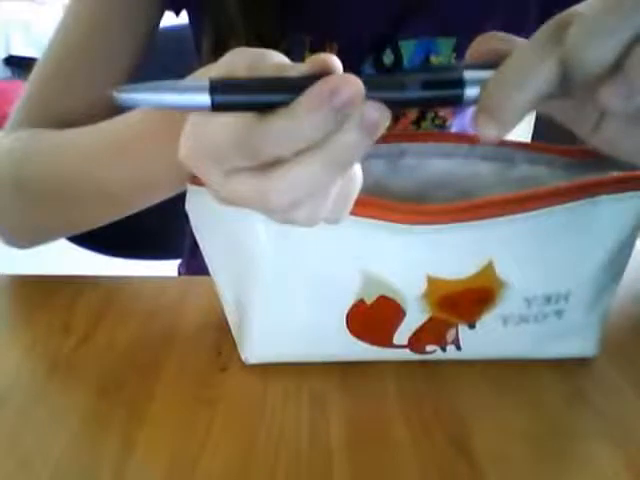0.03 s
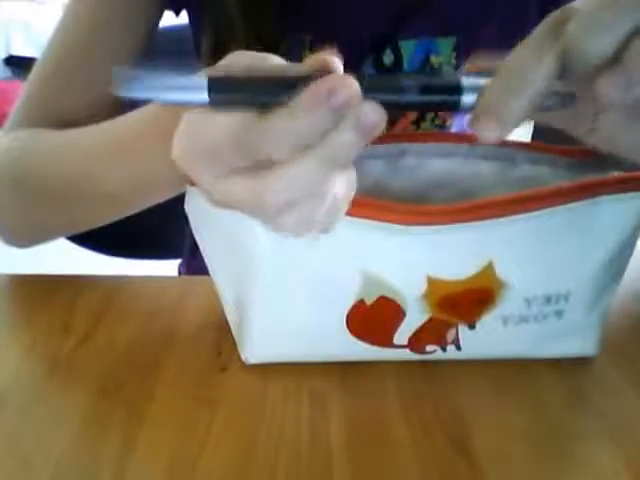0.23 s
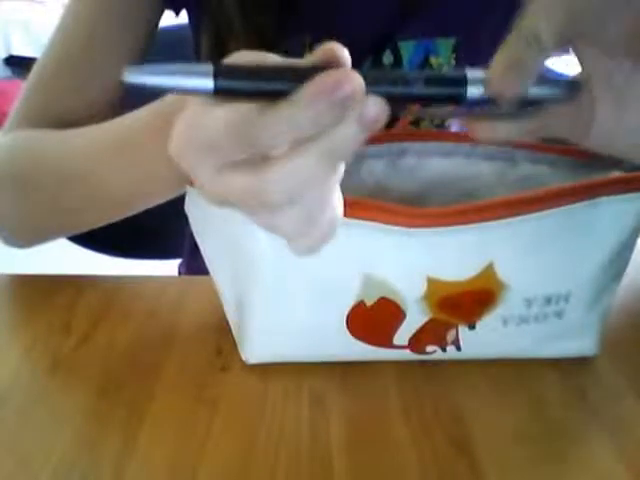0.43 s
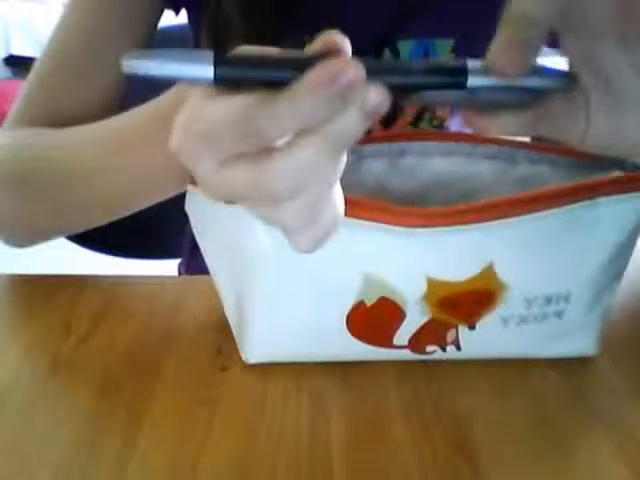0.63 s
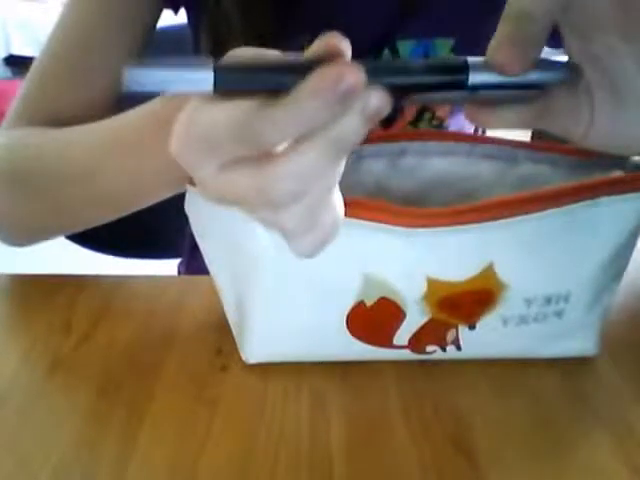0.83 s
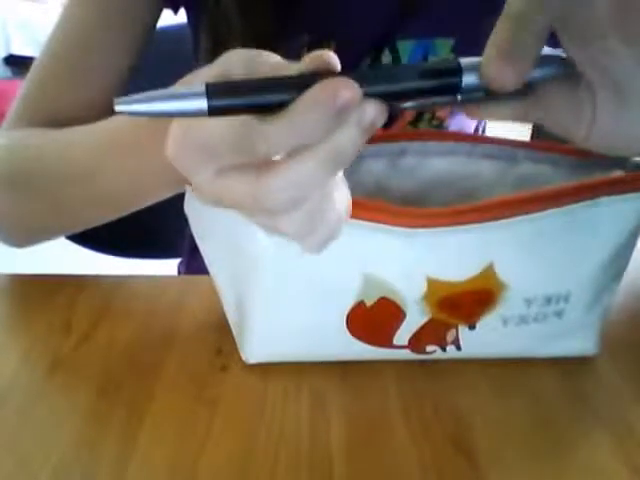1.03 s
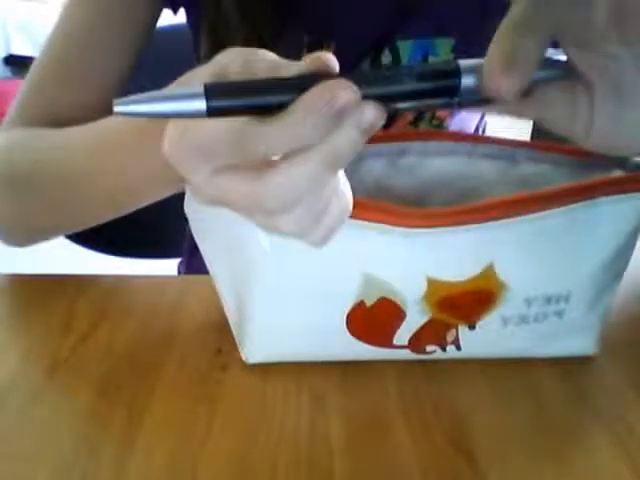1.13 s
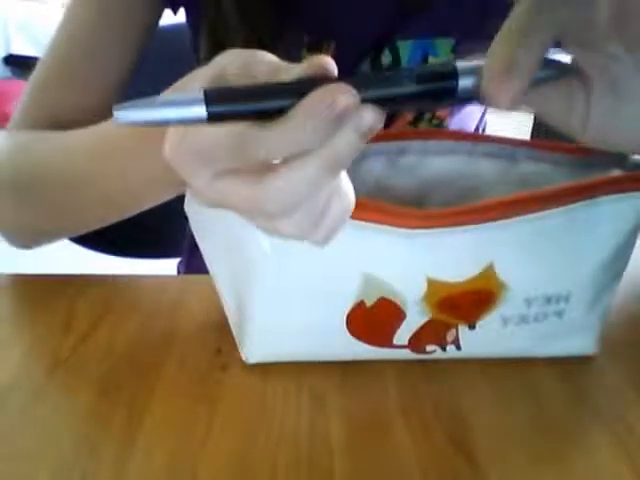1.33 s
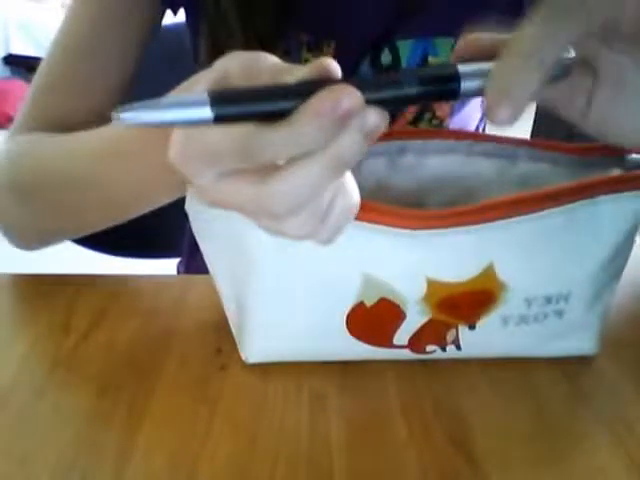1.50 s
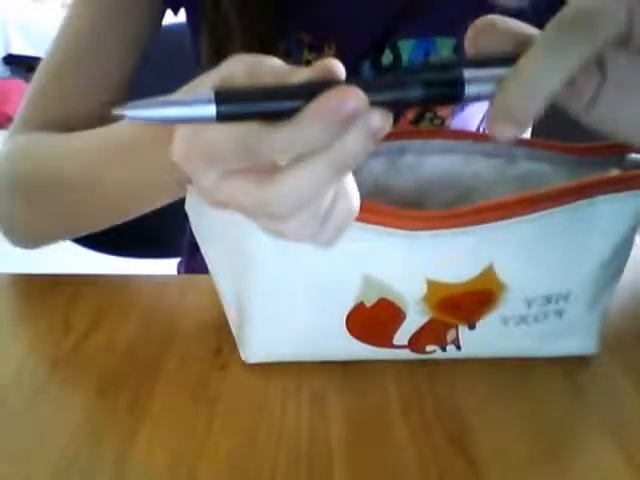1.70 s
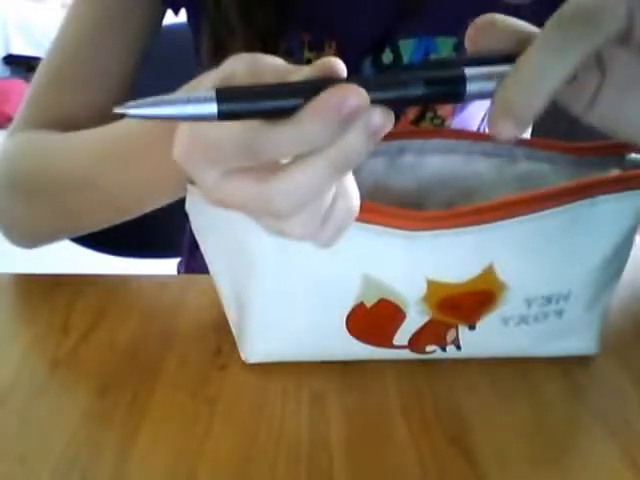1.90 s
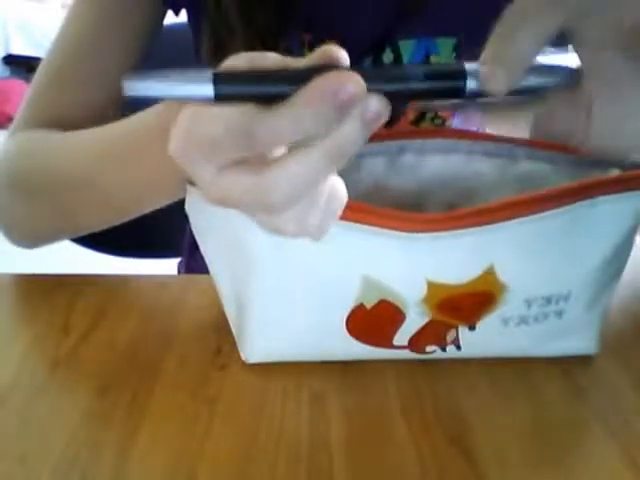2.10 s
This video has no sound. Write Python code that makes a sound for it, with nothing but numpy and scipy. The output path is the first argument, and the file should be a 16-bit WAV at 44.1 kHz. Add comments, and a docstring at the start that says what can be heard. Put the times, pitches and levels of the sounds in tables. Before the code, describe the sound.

A twist-action pen clicks sharply twice, with small ticks and faint scrapes between, in a quiet room.

```python
"""Hiss, hum, a faint intermittent whine and a soft low bump come first, in a quiet room close to a microphone.
Then a hand turns a twist-action pen: its mechanism snaps over its stops, with faint ticks in between.
Each snap is a noise crack plus decaying modes of the barrel; the thread scrapes as grains of small clicks.
Swelling noise bands make the hands' bumps and rubs and the singing spring.
Convolution with echoes and decaying noise makes the desk and room answer."""
import sys
import numpy as np
from scipy import signal
from scipy.fft import rfft, irfft
from scipy.io import wavfile
from scipy.ndimage import uniform_filter1d

SR = 44100
rng = np.random.default_rng(int(sys.argv[2]) if len(sys.argv) > 2 else 0)


def to_wav(sig):
    """Store sig (one row per channel, or 1-D mono) as 16-bit WAV at the path in sys.argv[1].

    Samples outside -1..1 are clipped; the rate is SR.
    """
    pcm = np.clip(np.atleast_2d(sig), -1, 1) * 32767
    pcm = np.round(pcm).astype(np.int16)
    wavfile.write(sys.argv[1], SR, pcm.T)  # frames by channels


N = 94903  # length in samples


def amp(db):
    """Logarithmic level: decibels become a linear amplitude ratio."""
    return 10 ** (np.asarray(db) / 20)


def unit(x):
    """Normalisation: the root-mean-square value becomes 1."""
    return x / np.sqrt(np.mean(x ** 2) + 1e-20)


def read(points, hz):
    """Interpolation on a logarithmic frequency axis, with constant values beyond both ends."""
    f, value = np.transpose(points)
    return np.interp(np.log(hz + 1), np.log(f + 1), value)


def add(mix, s, sound):
    """Superposition: a sound is summed into the mix at a time in seconds."""
    part = mix[max(round(s * SR), 0):][:len(sound)]
    part += sound[:len(part)]


def noise(gain, size):
    """Random-phase synthesis: noise of rms 1 whose amplitude spectrum is gain(Hz)."""
    hz = np.fft.rfftfreq(size, 1 / SR)
    phase = 2 * np.pi * rng.random(len(hz))
    return unit(irfft(gain(hz) * np.exp(1j * phase), size))


def band(hz, width_hz, size):
    """Resonance: noise under a single bell-shaped spectral peak."""
    return noise(lambda f: 1 / (1 + (2 * (f - hz) / width_hz) ** 2), size)


def swell(length, hz, width_hz, db):
    """Amplitude modulation: a band of noise swells and fades under a half sine, at an rms level in dB."""
    n = int(length * SR)
    envelope = np.sin(np.pi * np.arange(n) / n)
    return amp(db) * unit(band(hz, width_hz, size=16384)[:n] * envelope)


def background():
    """Stationary noise: room rumble and microphone hiss, with narrow-band hum and an intermittent whine."""
    # Spectrum of rumble and hiss. Each row: frequency in Hz, relative level in dB per Hz.
    floor_spectrum = [(15, -40.5), (25, -2.5), (48, -3), (76, -15), (114, -6), (256, -19), (354, -17),
                      (840, -19.5), (911, -19.5), (2000, -26), (4610, -31.5), (6210, -23.5), (6740, -36.5),
                      (8140, -36), (16000, -56)]
    # Start times of the whine in seconds.
    whine_starts = [0.10, 0.227, 0.605, 0.73, 0.858, 1.235, 1.36, 1.74, 1.865, 1.992, 2.118]
    floor_db, patch_db = -65.5, 1
    hiss_hz, hiss_width_hz, hiss_db = 6147, 390, -74  # a narrow band in the hiss
    hum_hz, hum_width_hz, hum_db = 118.3, 5, -76
    whine_hz, whine_width_hz, whine_s, whine_db = 7990, 70, 0.042, -79

    z = signal.stft(noise(lambda f: amp(read(floor_spectrum, f)), N), nperseg=1024)[2]
    # The level varies gently in patches of time and frequency
    patches = uniform_filter1d(rng.standard_normal(z.shape), size=12, axis=0)
    patches = unit(uniform_filter1d(patches, size=8, axis=1))
    rumble_and_hiss = signal.istft(z * amp(patch_db * patches), nperseg=1024)[1][:N]
    out = amp(floor_db) * unit(rumble_and_hiss)
    out += amp(hiss_db) * band(hiss_hz, hiss_width_hz, N)
    out += amp(hum_db) * band(hum_hz, hum_width_hz, N)
    for s in whine_starts:
        add(out, s, swell(whine_s, whine_hz, whine_width_hz, whine_db))
    return out


def room(x):
    """Linear convolution: direct sound, a few single echoes, close scatter and a short reverberant tail."""
    # Reflections from the desk and nearby things. Each row: delay in seconds, level in dB.
    reflections = [(.0012, -18.5), (.0023, -14), (.0047, -27), (.0083, -21), (0.0196, -27.5)]
    # Reverberation time. Each row: frequency in Hz, time to fall 60 dB in seconds.
    reverberation = [(300, .25), (2000, 0.24), (4000, 0.2), (6000, 0.22), (9000, 0.21), (15000, 0.11)]
    tail_db, near_db = -11.5, -6.5  # energy relative to the direct sound
    rise_s, near_t60_s = 0.0024, 0.032
    size = 16384
    t = np.arange(size) / SR

    hz, frames, z = signal.stft(noise(np.ones_like, size), SR, nperseg=256)
    decay = amp(-60 * frames / read(reverberation, hz)[:, None])
    tail = signal.istft(z * decay, SR, nperseg=256)[1][:size]
    near = noise(np.ones_like, size) * amp(-60 * t / near_t60_s)
    rise = np.minimum(t / rise_s, 1) ** 2
    response = (amp(tail_db) * unit(tail * rise) + amp(near_db) * unit(near * rise)) / np.sqrt(size)
    response[0] += 1  # direct sound
    for delay, db in reflections:
        add(response, delay, amp([db]))
    return signal.fftconvolve(x, response)[:N]


def hands():
    """Low-frequency noise bursts: the soft handling bumps of the hands."""
    # Soft bumps. Each row: start in seconds, length in seconds, centre frequency in Hz, rms level in dB.
    hand_bumps = [(0.079, 0.066, 105, -69.5), (0.409, 0.034, 50, -69), (0.497, 0.11, 115, -66),
                  (0.821, 0.04, 68.9, -64.5), (0.83, 0.034, 178, -67.5), (0.98, 0.058, 67, -62),
                  (0.995, 0.032, 140, -65), (1.27, 0.12, 121.4, -62.5), (1.348, 0.067, 60, -62.5),
                  (1.551, 0.036, 90, -57), (1.607, 0.038, 75.14, -53.5), (1.608, .06, 38, -53),
                  (1.843, 0.092, 115, -64), (1.991, .04, 60, -62.5), (2.031, 0.082, 154.2, -54.5),
                  (2.059, 0.15, 63.7, -65)]
    out = np.zeros(N)
    for s, length, hz, db in hand_bumps:
        add(out, s, swell(length, hz, width_hz=34, db=db))
    return out


def scrape(count=8):
    """Granular friction: turning the thread gives tiny slips at random moments."""
    # Scraping spells. Each row: start in seconds, length in seconds, central grain level in dB.
    scraping_spells = [(1.12, .13, -56), (1.279, 0.19, -55.5)]
    spread_db, grain_clack_db = 5, 9  # half-range of grain levels; emphasis of the clack range
    out = np.zeros(N)
    for s, length, db in scraping_spells:
        for when, size in rng.random((count, 2)):
            grain_db = db + spread_db * (2 * size - 1)
            add(out, s + length * when, click(grain_db, 0, 0, 0, grain_clack_db, 0, 0))
    return out


def click(db, thud_db, knock_db, hollow_db, clack_db, treble_db, air_db, size=1600):
    """Modal synthesis: contact noise and decaying modes, neighbours in opposite polarity, form one snap."""
    # Modes of the barrel and mechanism before detuning and colouring.
    # Each row: frequency in Hz, level in dB, time to fall 60 dB in seconds.
    pen_modes = [ (1127, -34, 0.018), (1973, -24.5, 0.018), (2693, -29.5, 0.0086), (3659, -19, .009),
                 (4370, -15.5, .010), (4880, -15.5, 0.0073), (5420, -8.5, .013), (5760, -10, .015),
                 (6302, -10, 0.016), (7100, -14.5, 0.014), (7320, -16.5, .010), (7640, -21.5, 0.017),
                 (8720, -28.5, .008), (9800, -29.5, .008), (11100, -34, 0.014), (12400, -39, .007),
                 (14000, -41, .006), ]
    # Crack of the contact before colouring. Each row: frequency in Hz, relative level in dB per Hz.
    crack_spectrum = [(100, -35.5), (320, -28.5), (600, -29.5), (1300, -17.5), (2500, -20), (3600, -7),
                      (4500, -8), (6000, 4.5), (8000, -7.5), (9500, -11), (12000, -22.5), (15500, -30)]
    crack_db, crack_t60_s = -11, 0.017
    detune = 0.011  # the grip shifts each mode by up to this fraction from click to click
    contact_s = 0.0005  # linear rise of a click
    # Centres of the ranges in Hz, with their gains in dB
    colour = [(575, 0), (1150, thud_db), (2160, knock_db), (2800, hollow_db),
              (4580, clack_db), (5830, 0), (9474, treble_db), (11600, air_db)]
    t = np.arange(size) / SR

    hz, level, t60 = np.transpose(pen_modes)[:, :, None]
    shift = 1 + detune * rng.uniform(-1, 1, hz.shape)
    envelopes = amp(level + read(colour, hz) - 60 * t / t60)
    modes = envelopes * np.sin(2 * np.pi * hz * shift * t)
    ring = modes[::2].sum(0) - modes[1::2].sum(0)

    crack = noise(lambda f: amp(read(crack_spectrum, f)), size)
    crack = irfft(rfft(crack) * amp(read(colour, np.fft.rfftfreq(size, 1 / SR))))
    crack = crack * amp(crack_db - 60 * t / crack_t60_s)
    return amp(db) * np.minimum(t / contact_s, 1) * (ring + crack)


def pen():
    """Impulsive excitation and narrow-band noise: all clicks, the singing spring and the rubbing fingers."""
    # Snaps and ticks of the mechanism. Each row: start in seconds, level in dB,
    # then gains of the thud, knock, hollow, clack, treble and air ranges in dB.
    mechanism_clicks = [ (0.2900, -38.5, 6, 15, 11.5, 3, -11, -16),
                        (0.335, -39.5, 5, -12.5, -2, -13, -16.5, -14),
                        (0.3482, -31.5, 15, -4.5, -4, 2.5, -9.5, -11),
                        (0.3507, -8, 4, 6.5, -8, 16, 0.5, -1), (0.3685, -28.5, -0.5, 2, 0, 2, 0, -7),
                        (0.4125, -16, 1, -18, 13, 3, -10, 4), (0.4140, -14.5, -6, -4, 4, 1, 11, -4),
                        (0.4168, -11, -16, -2, 0, -5, 0.5, -7), (0.5245, -45, -5, -4, -2, -2, -22, -4),
                        (0.9750, -45.5, 1.5, 1, 7, -11, -17, -7),
                        (0.9993, -37.5, 1, 0.5, 12.5, -8, -16, -16),
                        (1.0650, -52.5, -0.5, 3, 17, -1, -7.5, -5.5),
                        (1.1005, -40.5, 8.5, 8, 12, 3, 0.5, 2), (1.1035, -20.5, -9, 2, 8.5, -4, -0.5, -4.5),
                        (1.1066, -34, -2, -14, 9.5, 2, 5, 1), (1.1190, -36.5, 10, 2, -3, 3, -8, -4),
                        (1.2608, -46, 9.5, 3.5, 22.5, -1, -7, -10.5),
                        (1.3270, -47.5, 5.5, 8.5, 9, 6.5, -11.5, -8),
                        (1.3622, -33.5, -0.5, -2.5, -7.5, -2.5, -6.5, -11),
                        (1.4558, -32, -4.5, 6.5, 5.5, -5.5, -3, -4),
                        (1.4568, -20.5, -25, 1, 1.5, -5.5, -2.5, 2), (1.4912, -41, 8, 11, 7.5, 5.5, 0, -5),
                        (1.5570, -38, -7, 6.5, -2.5, 7, 0, 1.5), (1.5907, -38.5, -1, -1, -2.5, -3, -1.5, 4),
                        (1.5945, -34.5, -3, -7.5, -3.5, -0.5, -7, 2),
                        (1.5975, -28, -6, -1.5, -4.5, -4.5, -7, -3.5), (1.5996, -18, 2.5, 5, 0.5, 1, -2, 0),
                        (1.6006, 0, -1.5, -6.5, 2.5, -3.5, 2.5, 4), (1.6052, -14.5, 3, -2, 0, -5.5, 10, 3),
                        (1.6095, -23.5, 1, 4.5, -1, 0, 0.5, 2.5), (1.651, -35.5, 4.5, 16, 0, 0, 0, 2), ]
    # The spring sings on after the hard snaps.
    # Each row: start in seconds, length in seconds, frequency in Hz, rms level in dB before the room.
    spring_tones = [(0.363, 0.0095, 6220, -37), (0.385, 0.03, 4880, -52.5), (1.606, 0.033, 5983, -35.5),
                    (1.641, 0.0089, 5880, -33.5)]
    # Fingers rub and push on the barrel. Each row: start in seconds, length in seconds,
    # frequency in Hz, bandwidth in Hz, rms level in dB before the room.
    finger_rubs = [(0.412, 0.024, 500, 306, -66.5), (0.77, 0.1, 2050, 398, -75),
                   (1.14, 0.039, 1970, 296, -69.5), (1.318, .05, 1080, 800, -65.5),
                   (1.599, 0.013, 326.4, 160, -50.5)]
    out = np.zeros(N)
    for s, *row in mechanism_clicks:
        add(out, s, click(*row))
    for s, length, hz, db in spring_tones:
        add(out, s, swell(length, hz, width_hz=290, db=db))
    for s, *row in finger_rubs:
        add(out, s, swell(*row))
    return out


def scene():
    """Superposition: the pen in its room is summed with the dry hands and background."""
    pen_in_room = room(pen() + scrape())
    return (pen_in_room + hands() + background())[None]


def record(dry):
    """Saturation and low-pass filtering: the recorder rounds off the highest peaks, then limits the band."""
    ceiling, edge_hz = 0.85, 15700
    held = dry / (1 + (dry / ceiling) ** 6) ** (1 / 6)
    lowpass = signal.firwin(255, edge_hz, window=("kaiser", 8), fs=SR)
    return signal.oaconvolve(held, lowpass[None], "same")


dry = scene()
out = record(dry)
to_wav(out)
```